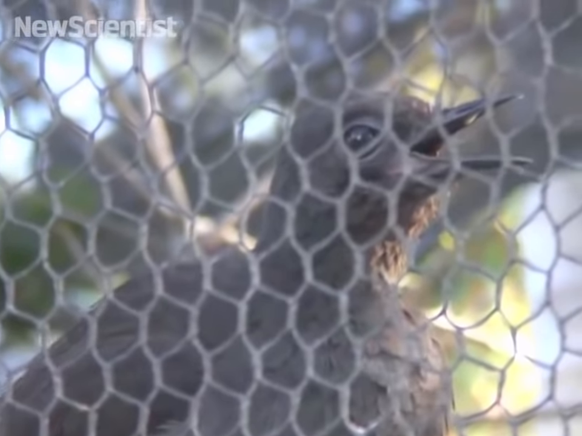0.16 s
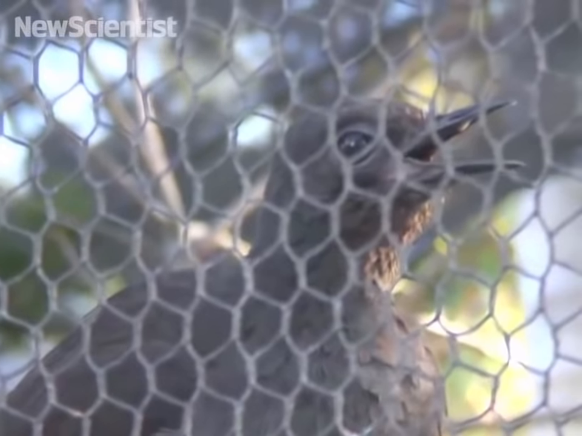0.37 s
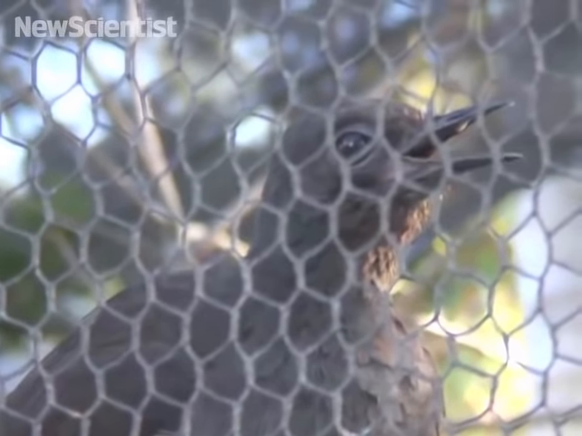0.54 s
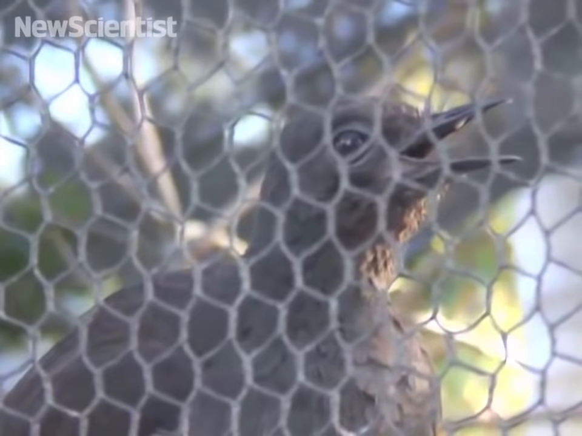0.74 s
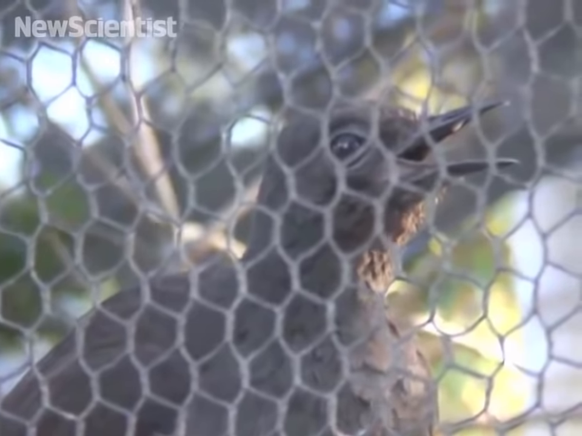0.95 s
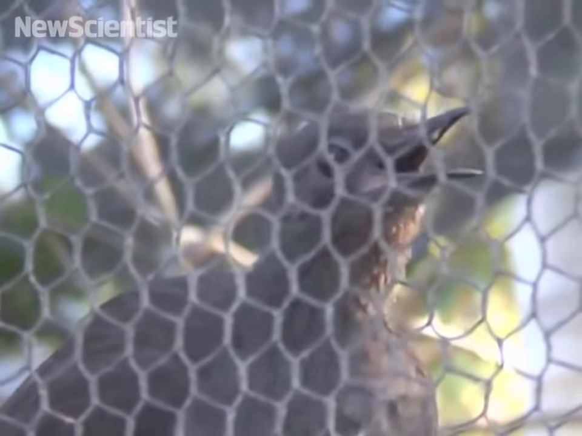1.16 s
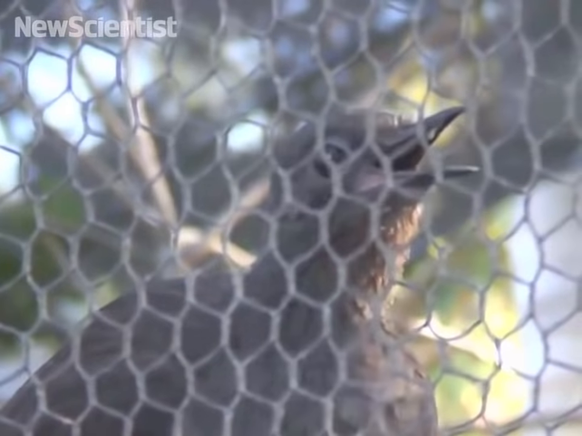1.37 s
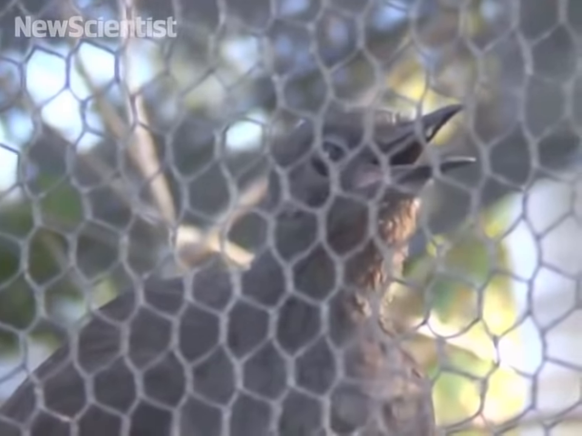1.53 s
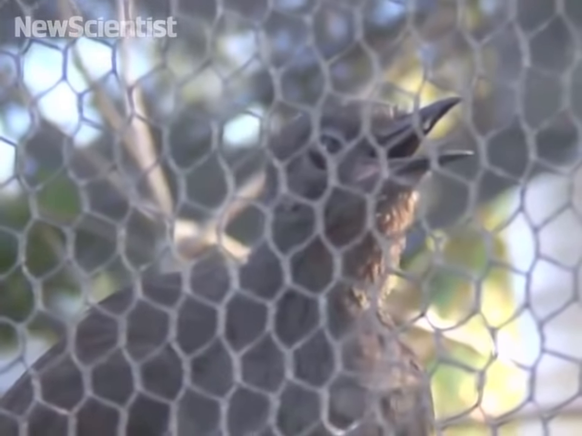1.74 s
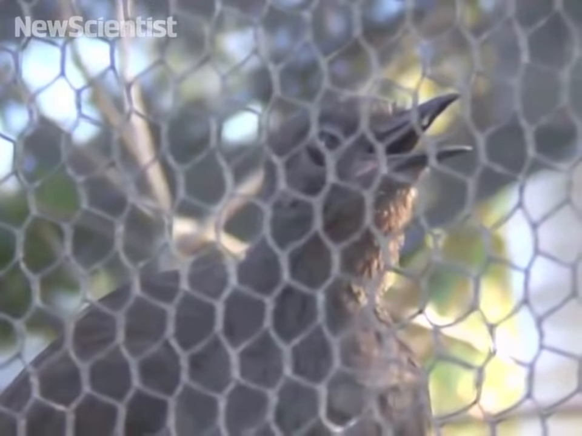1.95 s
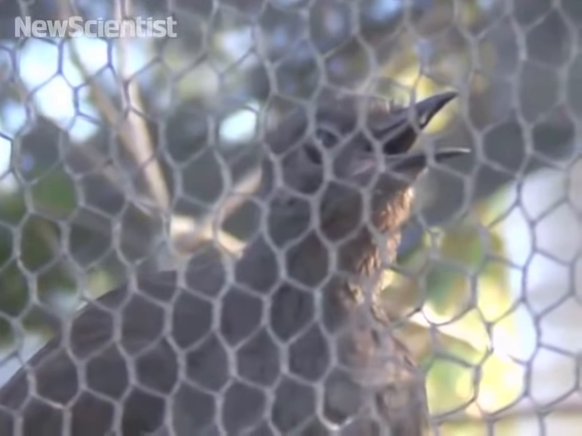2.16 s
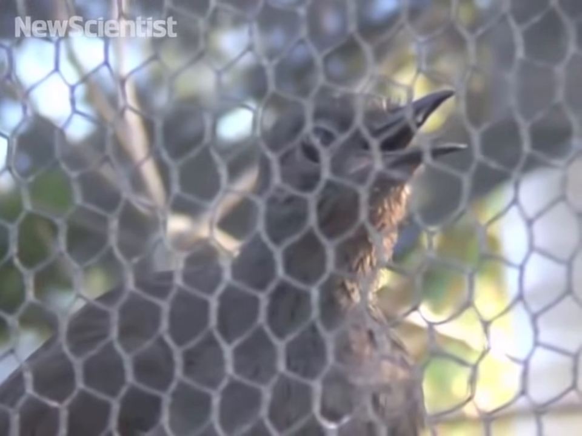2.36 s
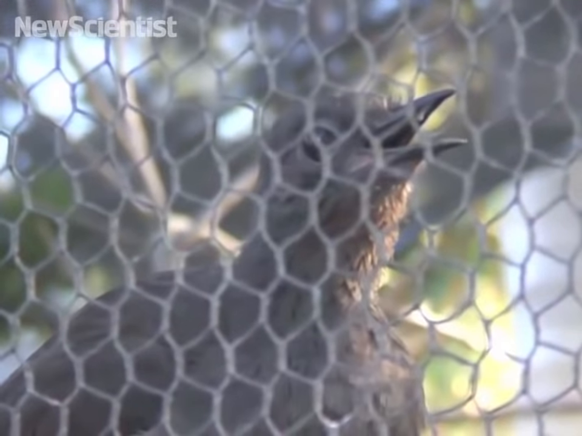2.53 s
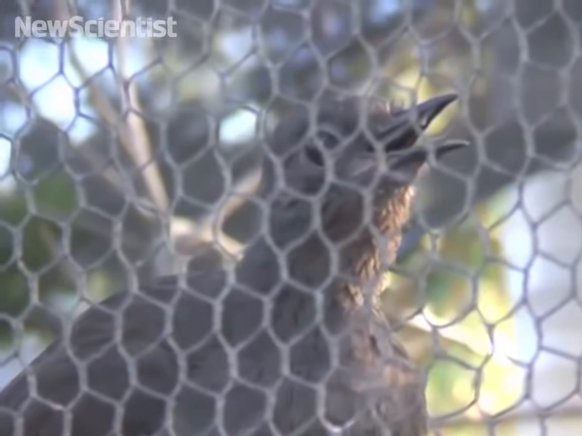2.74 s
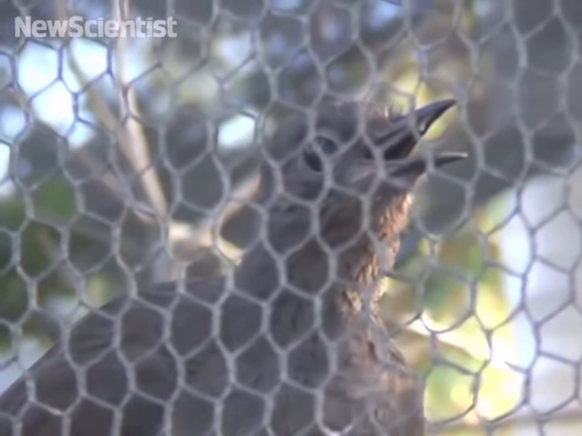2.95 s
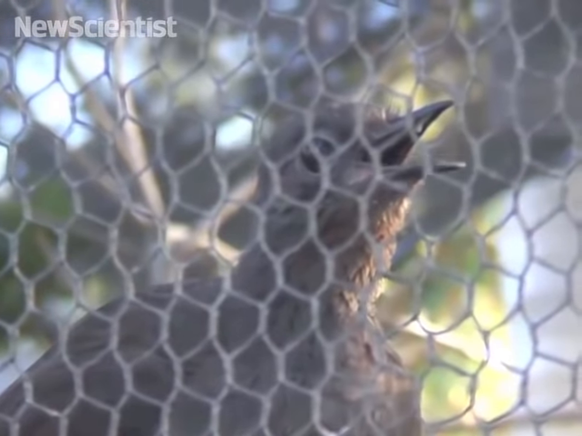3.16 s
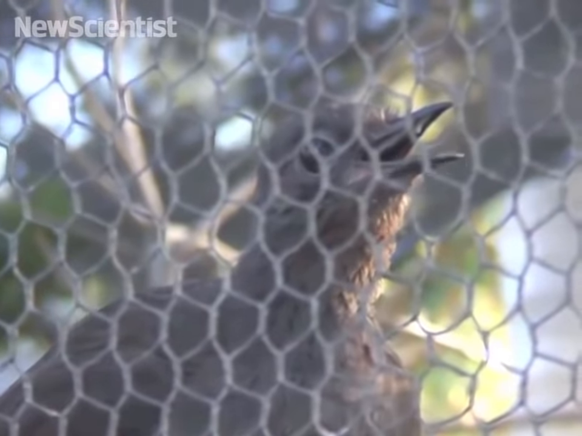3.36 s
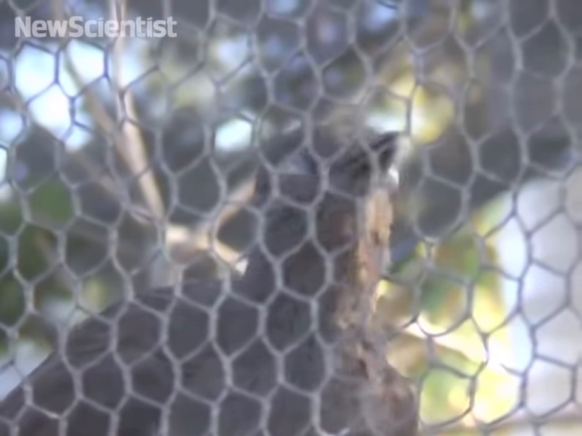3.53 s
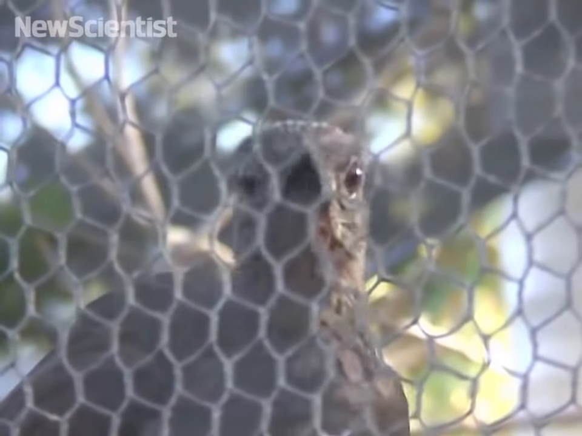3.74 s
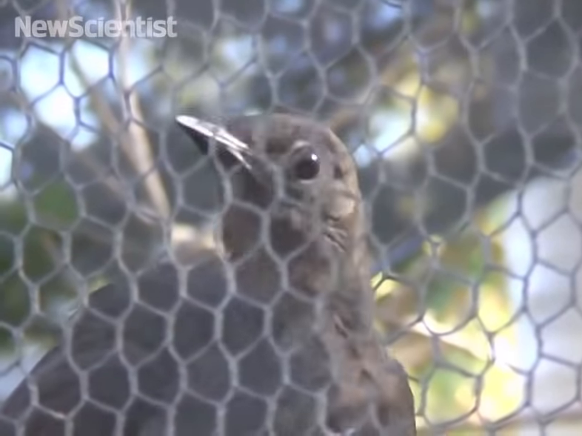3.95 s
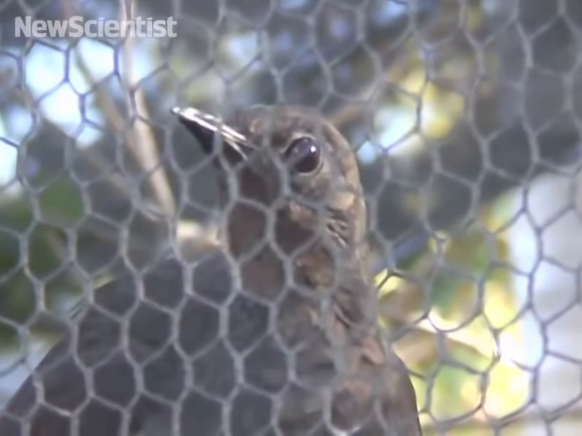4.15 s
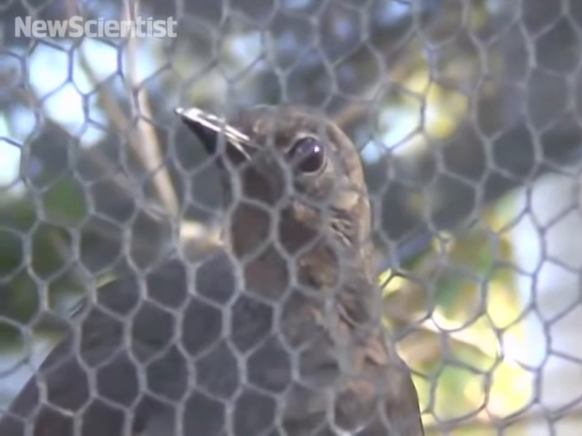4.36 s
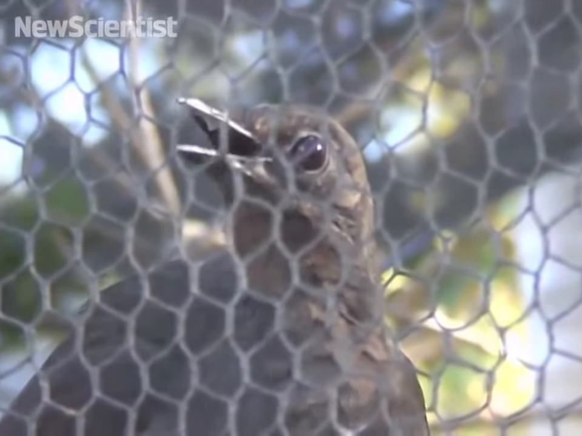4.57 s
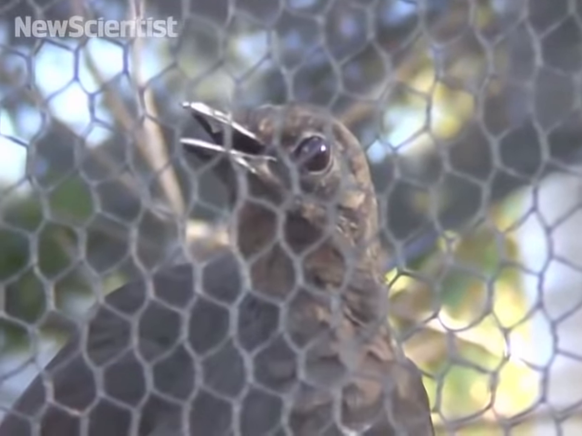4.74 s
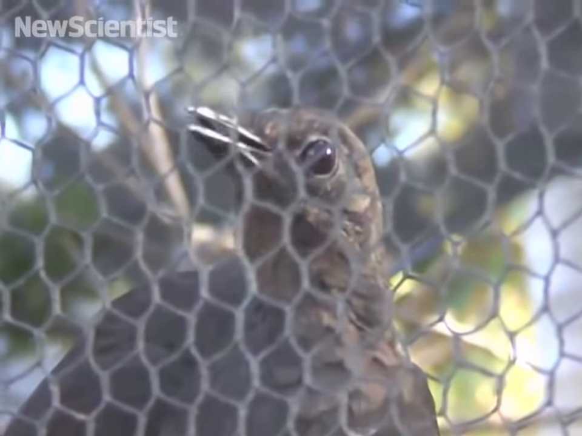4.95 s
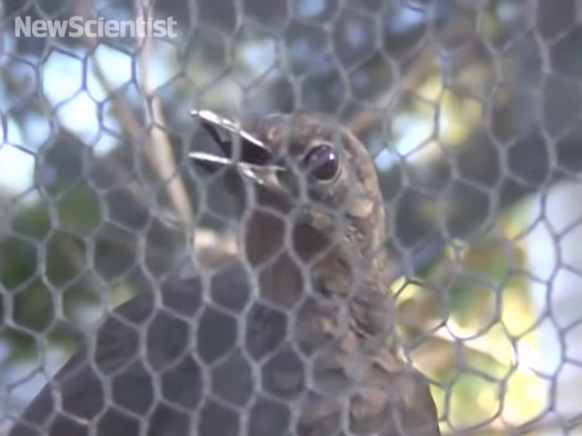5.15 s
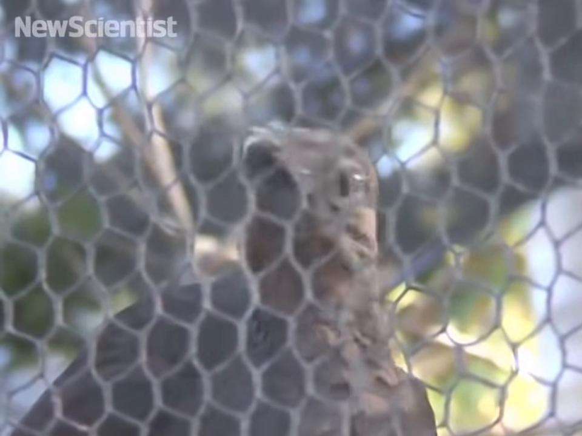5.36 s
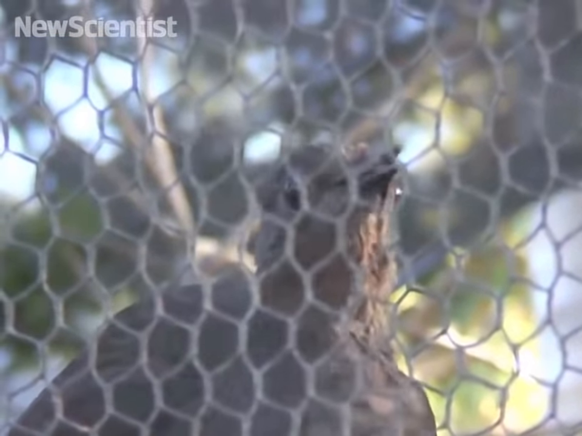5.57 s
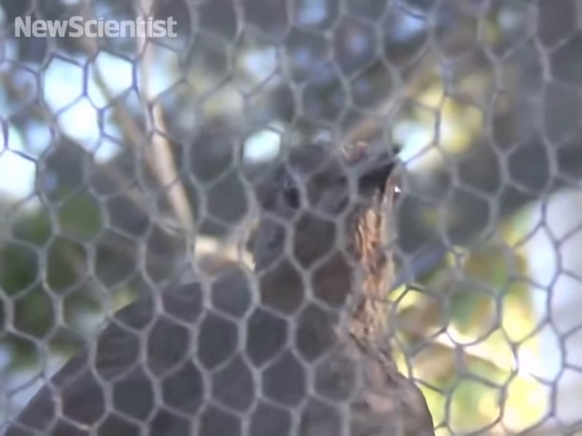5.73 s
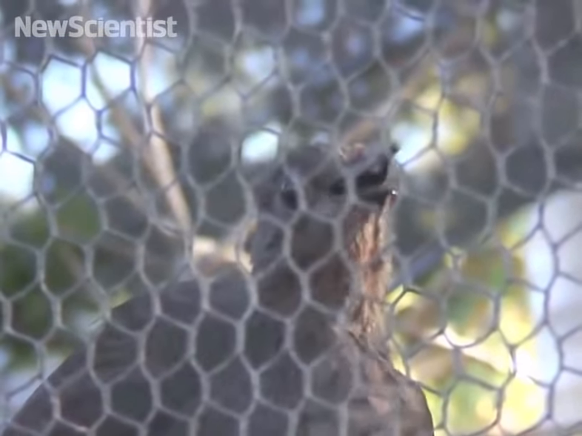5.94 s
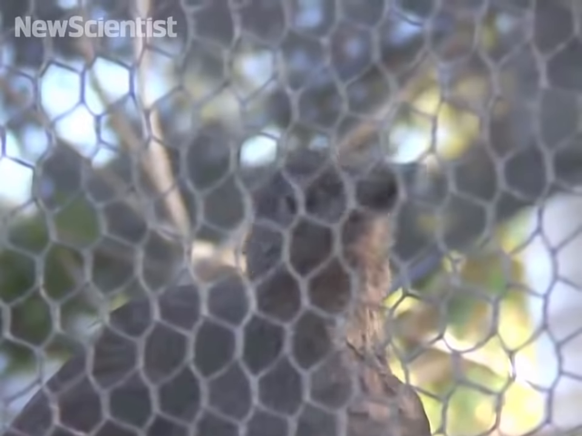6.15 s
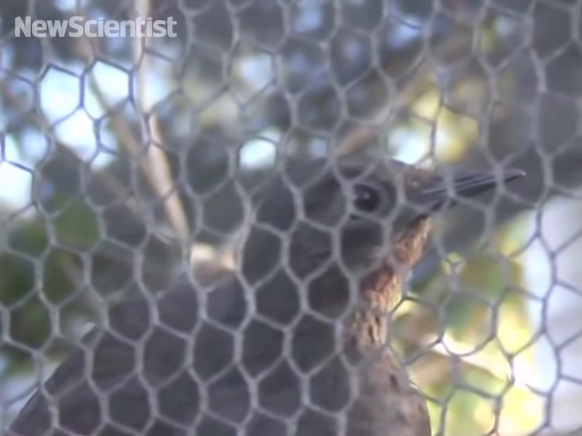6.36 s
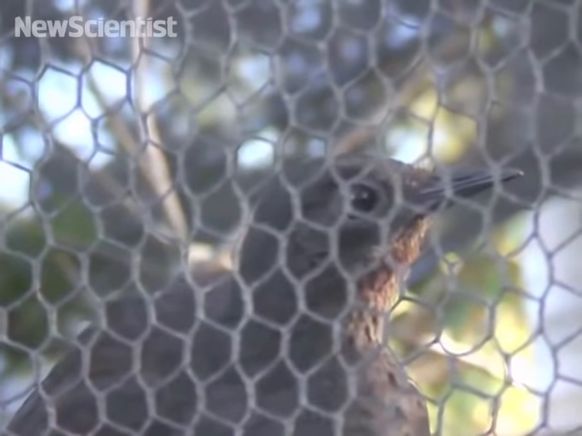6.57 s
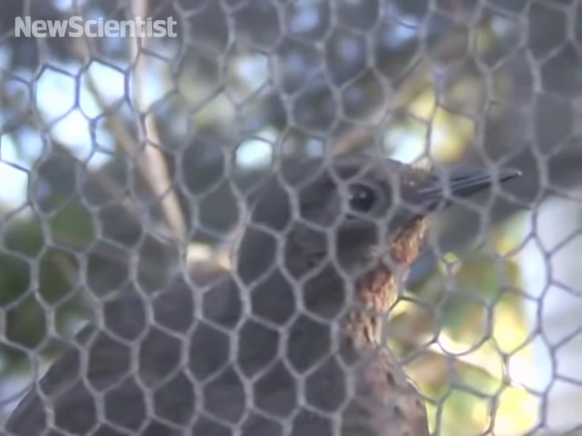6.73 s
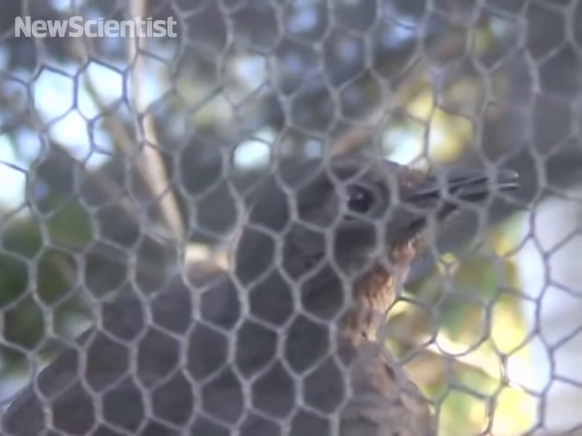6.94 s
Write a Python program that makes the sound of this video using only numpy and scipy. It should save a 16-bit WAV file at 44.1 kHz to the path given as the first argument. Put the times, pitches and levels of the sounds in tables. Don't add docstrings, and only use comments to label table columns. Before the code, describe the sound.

Fast buzzing ratchet chatter from a mimicking bird stops with a sharp crack; distant birds coo, then it grinds, squeals, yelps and knocks once more.

```python
import sys
import numpy as np
from scipy import signal
from scipy.io import wavfile
from scipy.ndimage import uniform_filter1d

SR = 44100
rng = np.random.default_rng(int(sys.argv[2]) if len(sys.argv) > 2 else 0)


def level_to_linear(level):
    exponent = np.asarray(level, float) / 20
    return 10 ** exponent


def wrap_up_sound(samples):
    columns = np.atleast_2d(samples).T
    tamed = np.clip(columns, -1, 1)
    steps = np.round(tamed * 32767).astype(np.int16)
    wavfile.write(sys.argv[1], SR, steps)


N = 308700

# f/Hz, level/dB
AIR_SPECTRUM = [(35, -28), (60, -25.5), (637, -3.5), (801, -5), (940, -10.5), (2580, -9.5), (2890, -9.5),
                (3240, -6.5), (3470, -10), (7580, -22.5), (8500, -24.5), (12500, -27), (14400, -40)]
# multiple of the tick rate, level/dB
TICK_PARTIALS = [(1, -83), (2, -79), (3, -80), (4, -81.5), (5, -91), (6, -86), (7, -101), (8, -101),
                 (9, -76.5), (10, -107)]
# t/s, f/Hz, level/dB
INSECT_LINE = [(0, 12400, -84), (3.6, 12450, -88), (4.0, 12400, -77), (4.5, 12050, -76), (5.0, 12050, -79),
               (5.5, 12250, -85), (6.2, 12350, -84), (7, 12300, -84)]
# t/s, length/s, start f/Hz, end f/Hz, level/dB
FAR_COOS = [
    (3.62, 0.079, 765, 690, -56),
    (3.795, .12, 660, 850, -55),
    (3.9, 0.22, 846, 797, -67),
    (4.08, 0.28, 814, 756, -59.5),
    (4.33, .27, 782, 646, -56),
    (6.11, .35, 880, 794, -67),
    (6.44, 0.23, 805, 780, -66),
    (6.62, .33, 872, 870, -64),
]
# t/s, length/s, start f/Hz, end f/Hz, level/dB
FAR_PIPES = [
    (3.82, 0.3, 910, 900, -64),
    (4.36, .18, 903, 915, -61),
]
# t/s, length/s, start f/Hz, end f/Hz, level/dB
FAR_PEEPS = [(4.26, 0.13, 3250, 2500, -48.5), (4.325, 0.076, 2600, 2150, -55), (4.33, .1, 3300, 2600, -54),
             (4.48, .12, 4200, 4300, -62), (5.59, .08, 3750, 3650, -50), (5.865, .03, 1900, 1950, -59),
             (5.8, .05, 3750, 3540, -58), (5.855, .085, 3740, 3700, -51), (5.89, .06, 2620, 2690, -56),
             (6.37, .03, 7200, 5800, -48), (6.396, 0.03, 6200, 7600, -52), (6.42, .035, 6300, 6500, -48),
             (6.41, .06, 7400, 7500, -56), (6.19, 0.17, 5650, 5450, -63), (6.715, .04, 6600, 6700, -57),
             (6.72, .04, 7000, 7800, -60), (5.02, 0.067, 6600, 6700, -61), (6.615, .09, 2680, 2780, -56),
             (6.13, .08, 3600, 3720, -56), (6.16, .1, 2600, 2650, -62), (6.84, .05, 2800, 2850, -60)]
# t/s, length/s, start f/Hz, end f/Hz, level/dB
NASAL_CALLS = [
    (3.979, .14, 1470, 1603, -62.5),
    (6.06, 0.14, 1450, 1538, -55.5),
]
# multiple, level/dB
NASAL_STACK = [(1, -7), (2, 5), (3, 7.5), (4, 3), (5, -10), (6, -15), (7, -16)]
# t/s, length/s, level/dB
FAR_SCREECHES = [
    (6.404, 0.27, -41.5),
    (6.711, 0.25, -42.5),
]
# factor on the sweep, width/Hz, level/dB
SCREECH_STACK = [(1.017, 1000, 4), (0.86, 180, -1), (0.716, 270, -7.5), (2, 1200, -16), (1.47, 820, -12.5)]
# t/s, f/Hz, level/dB
SCREECH_ONSET = [(0, 3200, -6), (.02, 3800, -1), (.03, 4500, -2), (.06, 4450, -7), (.12, 4500, -16)]

# f/Hz, level/dB per Hz
RASP_COLOUR = [(350, -27.5), (630, -13.5), (730, -3), (1350, -5), (2200, -0.5), (3390, -5.5), (4020, -2),
               (4560, -7), (5840, -8.5), (7040, -22.5), (7610, -17.5), (8490, -23.5), (11100, -21.5),
               (13500, -33.5), (14400, -70)]
# f/Hz, level/dB per Hz
SNAP_COLOUR = [(290, -49), (500, -16), (2310, -0.5), (3430, -3), (5770, -4.5), (7030, -19), (11200, -20.5),
               (13200, -31), (14400, -52)]
# t/s, level/dB
WHIRR_EFFORT = [(0.0, -26), (0.27, -30.5), (1.18, -30.5), (1.36, -29.5), (2.03, -30), (2.34, -26.5),
                (2.82, -28.5), (3.4, -28.5), (3.505, -29), (3.518, -36)]
# t/s, treble level/dB, ring f/Hz
BEAK_OPENING = [(0, -4.5, 2480), (.3, -4, 2180), (1.05, -1, 2160), (1.2, -1, 2680), (2.1, 2, 2600),
                (2.5, 2, 2720), (3.0, 1.5, 2260), (3.518, -0.5, 2140)]
# first snap t/s, rough gap/ms, peak level/dB
SNAP_RUNS = [(0.0334, 25, -13), (0.0844, 22, -16.5), (0.1508, 25, -17), (0.3029, 27, -22),
             (0.4641, 27, -19.5), (0.5456, 31, -19), (0.6393, 27, -20), (0.8002, 28, -16),
             (0.9106, 34, -16), (1.0119, 27, -19), (1.0674, 26, -16)]
# t/s, peak level/dB, ring f/Hz
LOUD_SNAPS = [(1.0674, -18, 1880), (1.0933, -17, 2240), (1.1202, -18, 2000), (1.1467, -13, 2680),
              (1.1716, -18, 2280), (1.1986, -12, 2370), (1.2245, -13, 2220), (1.2509, -14, 2040),
              (1.2779, -13, 2120), (1.3073, -12, 2320), (1.3348, -14, 2750), (1.3622, -12, 2320),
              (1.3881, -14, 2230), (1.4161, -14, 2790), (1.4425, -16, 2370), (1.4709, -16, 2800),
              (1.4964, -14, 2820), (1.5228, -17, 2020), (1.5498, -12, 2820), (1.5762, -13, 1460),
              (1.6031, -17, 2100), (1.6306, -17, 2940), (1.657, -16, 2800), (1.6815, -14, 2920),
              (1.7104, -11, 2750), (1.7368, -13, 2810), (1.7588, -13, 2330), (1.7867, -11, 2940),
              (1.8122, -14, 2810), (1.8431, -14, 2690), (1.877, -14, 1470), (1.9094, -15, 1910),
              (1.9404, -20, 1520), (1.9683, -14, 2810), (1.9962, -17, 2480), (2.0272, -14, 2740),
              (2.0566, -19, 2600), (2.084, -15, 2000), (2.1095, -14, 2940), (2.1359, -15, 2820),
              (2.1609, -13, 2830), (2.1858, -11, 2920), (2.2093, -11, 2690), (2.2337, -14, 2690),
              (2.2577, -14, 2830), (2.2816, -15, 2820), (2.3035, -10, 2690), (2.3285, -12, 2260),
              (2.3544, -15, 2690)]
# t/s, peak level/dB, ring f/Hz
LATER_SNAPS = [(2.3783, -14, 2050), (2.4013, -14, 2930), (2.4237, -16, 2300), (2.4452, -16, 2680),
               (2.4701, -14, 2820), (2.4946, -13, 2130), (2.5195, -14, 2530), (2.5465, -16, 2040),
               (2.5719, -17, 2760), (2.5973, -15, 2190), (2.6243, -14, 2170), (2.6517, -16, 2610),
               (2.6737, -17, 2200), (2.6956, -15, 2370), (2.7186, -15, 2780), (2.744, -17, 2300),
               (2.767, -16, 2080), (2.7894, -19, 2310), (2.8119, -17, 2370), (2.8358, -18, 2040),
               (2.8568, -17, 2010), (2.8862, -18, 2090), (2.9061, -19, 2200), (2.9316, -19, 2930),
               (2.9525, -18, 1940), (2.9785, -16, 2320), (3.0034, -20, 2700), (3.0289, -19, 1930),
               (3.0538, -20, 1450), (3.0817, -15, 2540), (3.1087, -14, 2100), (3.1361, -18, 1880),
               (3.1646, -17, 1890), (3.194, -14, 2380), (3.2224, -13, 2330), (3.2479, -17, 2090),
               (3.2753, -16, 2050), (3.3012, -14, 2040), (3.3342, -18, 2080), (3.3591, -16, 2100),
               (3.3895, -16, 2200), (3.4165, -19, 2140), (3.4419, -16, 2730), (3.4773, -17, 2830),
               (3.5048, -18, 1920)]
# start t/s, end t/s, slap rate f/Hz, level/dB
WIND_UP_SLAPS = (3.514, 3.538, 642.5, -33.5)
# t/s, crack level/dB, crack length/s, slap rate f/Hz, tail t60/s, tail level/dB, tail length/s
KNOCK_BLOWS = [
    (3.5365, -6.5, 0.0068, 1167, 0.088, -15, 0.023),
    (6.9445, -1.3, 0.0073, 760, 0.19, -22, .15),
]
# f/Hz, level/dB per Hz
CRACK_COLOURS = [
    [(240, -37), (400, -20), (2490, -1), (3310, -8), (3950, 3), (4660, -11), (8440, -21), (9370, -19.5),
     (14000, -37)],
    [(240, -51), (400, -25.5), (1400, 0), (2890, -4), (4390, -15.5), (5170, -38), (5730, -26), (9230, -24),
     (14000, -45)],
]
# f/Hz, level/dB per Hz
TAIL_COLOURS = [
    [(210, -40), (400, -7), (818, -4), (1130, -8), (5290, -13), (5810, -10), (6990, -30), (11100, -33),
     (14000, -43)],
    [(180, -60), (300, -28), (427, -3.5), (726, 0), (4540, -21), (6170, -31), (6790, -30), (9220, -25),
     (14000, -42)],
]
# t/s, peak level/dB, length/s
SQUEAL_CATCHES = [
    (4.608, -20, 0.0053),
    (4.618, -31, 0.0086),
    (4.623, -32, 0.0048),
    (4.632, -21.5, 0.0072),
    (4.645, -22, 0.0081),
    (4.655, -29, 0.0076),
    (4.674, -21.5, 0.0041),
]
# f/Hz, level/dB
OVERTONE_LEVELS = [(300, -3.5), (1400, -3.5), (2600, -3.5), (4000, -5), (5300, -8), (7000, -23),
                   (10000, -25), (14000, -42)]
# t/s, pitch f/Hz, tone level/dB, rasp level/dB
GRIND_CURVE = [(4.655, 641.2, -43.5, -53), (4.69, 717, -38, -48), (4.746, 715, -33, -49)]
# t/s, pitch f/Hz, tone level/dB, rasp level/dB
LONG_SQUEAL_CURVE = [(4.757, 950, -35, -44), (4.785, 1138, -32, -44.5), (4.829, 1275, -35, -45.5),
                     (4.881, 1345, -34, -49.5), (4.93, 1292, -37, -48), (4.965, 1199, -39, -48.5),
                     (4.995, 850, -38.5, -64), (5.04, 472, -43.5, -67), (5.11, 410, -48, -88)]
# t/s, pitch f/Hz, tone level/dB, rasp level/dB
HIGH_SQUEAL_CURVE = [(5.135, 531.6, -40, -60), (5.203, 620, -38.5, -49), (5.222, 920, -33, -56),
                     (5.27, 1440, -30.5, -49), (5.312, 1790, -30, -53), (5.337, 1520, -30, -49),
                     (5.37, 755, -40.5, -56), (5.39, 468, -44.5, -70), (5.43, 400, -64, -85)]
# t/s, pitch f/Hz, tone level/dB, rasp level/dB
FIRST_RASP_CURVE = [(5.465, 521.4, -64, -78), (5.482, 560, -39.5, -59), (5.52, 686, -37, -49.5),
                    (5.56, 800, -34, -53), (5.59, 600, -42, -54), (5.62, 450, -50, -64),
                    (5.66, 440, -58, -71)]
# t/s, pitch f/Hz, tone level/dB, rasp level/dB
YELP_CURVE = [(5.69, 516.4, -48, -72), (5.705, 700, -34.5, -51), (5.733, 850, -29.5, -44),
              (5.76, 707, -31, -40.5), (5.78, 570, -37.5, -46), (5.805, 430, -44, -67),
              (5.83, 370, -66, -90)]
# t/s, pitch f/Hz, tone level/dB, rasp level/dB
LAST_RASP_CURVE = [(5.94, 600, -68, -82), (5.957, 688.4, -38, -64), (5.981, 736, -35, -51),
                   (6.02, 740, -35.5, -46.5), (6.045, 658.6, -41.5, -51.5), (6.065, 521, -48, -65),
                   (6.089, 430, -50.5, -66), (6.11, 405, -71, -79)]
# start t/s, hoarseness 0-1, share of the second voice 0-1, brightness/dB per octave
VOICE_STATES = [
    (4.6, .6, .2, -2),
    (4.765, .13, .45, -1.4),
    (4.98, .12, .03, -2.5),
    (5.125, .95, .3, 0),
    (5.207, .2, .05, -.3),
    (5.45, .95, .35, 0),
    (5.6, .9, .1, -1),
    (5.69, .45, .15, 0),
    (5.79, .3, 0, -1),
    (5.9, .9, .75, -1),
]
# t/s, dip/dB
SQUEAL_BREAKS = [
    (5.207, -6),
    (5.222, -4),
    (5.25, -9),
    (5.27, -6),
    (5.292, -9),
    (5.309, -7),
    (5.336, -4),
    (5.353, -8),
    (5.372, -3),
]
# f/Hz, width/Hz, level/dB
HOUSING_RIPPLE = [(962, 174, 4), (3460, 280, -2.5), (4100, 180, 3.5), (5350, 130, -4.5), (6060, 510, 4.5),
                  (6900, 220, -4), (7820, 230, 6), (8240, 530, -6), (9330, 210, 6), (10180, 340, -5),
                  (10780, 260, 3), (12300, 270, -1)]


def evened(x):
    return x / np.sqrt(np.mean(x ** 2) + 1e-20)


def read(points, hz):
    f, value = np.transpose(points)
    return np.interp(np.log(hz + 1), np.log(f + 1), value)


def add(mix, s, sound):
    part = mix[round(s * SR):][:len(sound)]
    part += sound[:len(part)]


def spread(rows):
    s, *columns = np.transpose(rows)
    t = np.arange(s[0], s[-1], 1 / SR)
    return s[0], [np.interp(t, s, c) for c in columns]


def drift(size, span):
    once = uniform_filter1d(rng.standard_normal(size), int(span))
    return evened(uniform_filter1d(once, int(span)))


def coloured(x, gain_db):
    both_sides_db = np.r_[gain_db, gain_db[-2:0:-1]]
    log_gain = np.log(level_to_linear(np.maximum(both_sides_db, -100)))
    taps = np.fft.ifft(np.exp(np.conj(signal.hilbert(log_gain)))).real[:2048]
    return signal.oaconvolve(x, taps)[:len(x)]


def shaped(x, points):
    return evened(coloured(x, read(points, np.fft.rfftfreq(4096, 1 / SR))))


def highpass(x, order, hz):
    return signal.sosfilt(signal.butter(order, hz, "high", fs=SR, output="sos"), x)


def resonate(x, hz, width):
    turn = np.exp(2j * np.pi * np.cumsum(hz * np.ones(len(x))) / SR)
    r = np.exp(-np.pi * width / SR)
    return 2 * (turn * signal.lfilter([(1 - r) ** 2], [1, -2 * r, r * r], x / turn)).real


def diffuse_tail(size, t60):
    tail = rng.standard_normal(size) * level_to_linear(-60 * np.arange(size) / SR / t60)
    return tail / np.linalg.norm(tail)


def aviary_air():
    level_db = -54.5 + 1.0 * drift(N, span=2100)
    return level_to_linear(level_db) * shaped(rng.standard_normal(N), AIR_SPECTRUM)


def camera_hum():
    tick_hz, first_tick_s = 50 / 3, .0061
    turns = (np.arange(N) / SR - first_tick_s) * tick_hz
    return sum(np.sqrt(2) * level_to_linear(db) * np.cos(2 * np.pi * round(k) * turns) for k, db in TICK_PARTIALS)


def insect():
    hz, level_db = spread(INSECT_LINE)[1]
    return level_to_linear(level_db - 1) * evened(resonate(rng.standard_normal(len(hz)), hz, width=13))


def far_call(start, length, hz, end_hz, db, partials, width, bend=1):
    u = np.arange(0, length, 1 / SR) / length
    glide = end_hz + (hz - end_hz) * (1 - u) ** bend
    noise = rng.standard_normal(len(u))
    call = sum(level_to_linear(part_db) * evened(resonate(noise, k * glide, width * k)) for k, part_db in partials)
    return start, level_to_linear(db - 2) * call * np.sin(np.pi * u) ** 0.52


def screech(start, length, db):
    base_hz, top_hz, sag_hz_per_s, sweep_s = 3700, 6630, 4700, 0.087
    rise_s, fade_db = .03, -14.5
    t = np.arange(0, length, 1 / SR)
    hz = top_hz - (top_hz - base_hz) * np.exp(-t / sweep_s) - sag_hz_per_s * t
    noise = rng.standard_normal(len(hz)) * level_to_linear(2.0 * drift(len(hz), span=72))
    bands = sum(level_to_linear(band_db) * evened(resonate(noise, k * hz, w)) for k, w, band_db in SCREECH_STACK)
    bands = evened(bands) * np.minimum(.25 + t / .07, 1)
    edge_hz, edge_db = spread(SCREECH_ONSET)[1]
    add(bands, 0, level_to_linear(edge_db) * evened(resonate(noise[:len(edge_hz)], edge_hz, width=220)))
    rise = np.minimum(0.45 + .6 * t / rise_s, 1)
    return start, rise * level_to_linear(db + fade_db * (t / length) ** 2) * bands


def far_birds():
    out, further = np.zeros(N), np.zeros(N)
    add(out, 0, insect())
    for calls, width_hz in ((FAR_COOS, 30), (FAR_PIPES, 13), (FAR_PEEPS, 110)):
        for row in calls:
            add(out, *far_call(*row, [(1, 0)], width_hz))
    for row in NASAL_CALLS:
        add(out, *far_call(*row, NASAL_STACK, width=45, bend=2.5))
    for row in FAR_SCREECHES:
        add(further, *screech(*row))
    wet = level_to_linear(-4) * out + level_to_linear(2.5) * further
    return out + further + signal.oaconvolve(wet, diffuse_tail(SR // 2, t60=.5))[:N]


def rasp(size, hz, jitter, breath, flutter_db, colour=RASP_COLOUR, uneven_db=3.0):
    turns = np.cumsum(hz * level_to_linear(jitter * drift(size, span=30))) / SR
    slaps = np.diff(np.floor(turns), prepend=0) > 0
    slaps = slaps * level_to_linear(uneven_db * np.clip(rng.standard_normal(size), -2, 2))
    flutter = np.cos(2 * np.pi * np.cumsum(185 * (1 + 0.1503 * drift(size, span=291))) / SR)
    source = evened(slaps) + breath * rng.standard_normal(size)
    return shaped(source * level_to_linear(flutter_db * flutter), colour)


def catch(db, length):
    t = np.arange(round(3 * length * SR)) / SR
    slaps = rasp(len(t), 700, jitter=1.2, breath=0.52, flutter_db=-5)
    slaps += 0.75 * np.sin(2 * np.pi * 720 * t)
    return level_to_linear(db - 10) * slaps * np.minimum(t / 0.00065, 1) / (1 + (t / length) ** 6)


def stutter(t, hz):
    break_s, step_share = .002, .4
    when, dip_db = np.transpose(SQUEAL_BREAKS)
    middle = (when[1:] + when[:-1]) / 2
    step = np.clip(np.searchsorted(when, t) - 1, 0, len(middle) - 1)
    inside = (t > when[0]) * (t < when[-1])
    cling = step_share * (np.interp(middle, t, hz)[step] - hz) * inside
    gaps_db = sum(db * np.exp(-((t - s) / break_s) ** 2) for s, db in zip(when, dip_db))
    return hz + uniform_filter1d(cling, size=120), level_to_linear(gaps_db)


def song():
    syllables = GRIND_CURVE + LONG_SQUEAL_CURVE + HIGH_SQUEAL_CURVE
    syllables = syllables + FIRST_RASP_CURVE + YELP_CURVE + LAST_RASP_CURVE
    s, (hz, tone_db, rasp_db) = spread(syllables)
    size = len(hz)
    t = s + np.arange(size) / SR
    hz, gaps = stutter(t, uniform_filter1d(hz, 350) * (1 + .009 * drift(size, span=350)))

    when, *columns = np.transpose(VOICE_STATES)
    state = np.searchsorted(when, t) - 1
    change_s = 0.0282
    hoarse, second, bright_db = (uniform_filter1d(c[state], round(change_s * SR)) for c in columns)

    turns = np.cumsum(hz * (1 + .09 * hoarse * drift(size, span=120))) / SR
    soft_db = bright_db + 0.21 * np.minimum(tone_db + 44, 0) + 2.6 * np.log2(hz / 2000)
    tone = np.zeros(size)
    for k in range(1, 16):
        level_db = read(OVERTONE_LEVELS, k * hz) - read(OVERTONE_LEVELS, hz)
        level_db += (soft_db + 1.27 * drift(size, span=280)) * np.log2(k)
        tone += level_to_linear(level_db) * (k * hz < 12000) * np.cos(2 * np.pi * k * turns)

    growl_pulse_db = 5 * np.cos(2 * np.pi * 76 * t)
    growl = resonate(rng.standard_normal(size), 700, width=117) * level_to_linear(growl_pulse_db)
    growl = second * evened(growl)
    half = level_to_linear(-17 + 5 * drift(size, span=150)) * (t < 4.75) * np.cos(np.pi * turns)
    air = rasp(size, hz, jitter=3.5, breath=0.51, flutter_db=2.0)
    air += 0.31 * highpass(air, 2, 6500)
    beat = level_to_linear((1.0 + 1.3 * hoarse) * drift(size, span=210))
    voice = gaps * beat * tone * (1 + 0.3 * growl) + .5 * growl + half
    voice = np.sqrt(2) * level_to_linear(tone_db) * voice + level_to_linear(rasp_db + 7 + 9.8 * hoarse) * air
    return s, highpass(voice, 4, 335)


def knock(db, crack, hz, t60, tail_db, length, crack_colour, tail_colour):
    t = np.arange(SR // 5) / SR
    blow = rasp(len(t), hz, jitter=0.67, breath=0.57, flutter_db=-1.5, colour=crack_colour, uneven_db=-0.5)
    blow *= np.sin(np.pi * np.minimum(t / crack, 1))
    blow *= level_to_linear(db) / abs(blow).max()
    tail = rasp(len(t), 750, jitter=1.3, breath=0.88, flutter_db=0.5, colour=tail_colour)
    tail *= level_to_linear(tail_db - 60 * t / t60) * np.minimum(t / crack, 1)
    return blow + tail / (1 + (t / length) ** 4)


def snaps():
    start, gap_ms, db = np.transpose(SNAP_RUNS)
    number = np.r_[0, np.cumsum(np.round(np.diff(start) / gap_ms[:-1] * 1000))]
    each = np.arange(number[-1])
    chance, luck = rng.random((len(each), 2)).T
    scatter_db = 1.5 * (2 * luck - 1)
    level_db = db[np.searchsorted(number, each, "right") - 1] + scatter_db
    even = list(zip(np.interp(each, number, start), level_db, 2200 + 600 * chance))
    later = [(s, peak_db - 1.5, hz) for s, peak_db, hz in LATER_SNAPS]
    return even + LOUD_SNAPS + later


def whirr():
    _, (effort_db,) = spread(WHIRR_EFFORT)
    _, (beak_db, beak_hz) = spread(BEAK_OPENING)
    out = np.zeros(N)
    voice = rasp(N, 800, jitter=4.0, breath=1.14, flutter_db=1.5, uneven_db=3.5)
    throat = np.interp(np.arange(N) / SR, [0, 1.6, 2.1, 2.45, 2.8, 3.5], [1, .6, .7, 1.3, .7, .6])
    voice += 0.58 * throat * resonate(voice, 727, width=90)
    add(voice, 0, 0.38 * resonate(voice[:len(beak_hz)], beak_hz, width=930))
    bursts = rasp(N, 3500, jitter=3.0, breath=3.2, flutter_db=-0.1, colour=SNAP_COLOUR)
    t = np.arange(300) / SR
    swell = np.exp(-((t - .004) / np.where(t < .004, .0019, .0008)) ** 2)
    crack = np.exp(-((t - .004) / np.where(t < .004, .001, .0024)) ** 2)
    for s, db, ring_hz in snaps():
        ring = np.sin(2 * np.pi * ring_hz * t * (.88 + 22 * t))
        add(out, s - .0022, 0.43 * level_to_linear(db) * swell * ring)
        add(out, s - .0019, level_to_linear(db - 15.5) * evened(crack * bursts[round(s * SR):][:len(t)]))
    add(out, .0046, 0.3 * out.copy())
    add(out, 0, level_to_linear(effort_db - 3.4) * voice[:len(effort_db)])
    treble = highpass(out, 2, 6500)[:len(beak_db)]
    add(out, 0, (level_to_linear(beak_db) - 1) * treble)
    start, end, hz, db = WIND_UP_SLAPS
    slaps = rasp(round((end - start) * SR), hz, jitter=.3, breath=.15, flutter_db=-7.0, uneven_db=-3.0)
    add(out, start, level_to_linear(db) * slaps)
    return out


def near_bird():
    bird = np.zeros(N)
    add(bird, *song())
    for s, *row in SQUEAL_CATCHES:
        add(bird, s, catch(*row))
    for (s, *row), crack, tail in zip(KNOCK_BLOWS, CRACK_COLOURS, TAIL_COLOURS):
        add(bird, s, knock(*row, crack, tail))
    bird += level_to_linear(-10) * signal.oaconvolve(bird, diffuse_tail(SR // 8, t60=0.06))[:N]
    bird += whirr()
    return highpass(bird, 3, 260)


def scene():
    return (near_bird() + far_birds() + aviary_air() + camera_hum())[None]


def top_cut(x):
    return signal.sosfilt(signal.butter(12, 14560, fs=SR, output="sos"), x)


def record(dry):
    hz = np.fft.rfftfreq(4096, 1 / SR)
    ripple_db = sum(db * np.exp(-((hz - f) / w) ** 2) for f, w, db in HOUSING_RIPPLE)
    ripple_db -= 50 * (hz > 14400)
    mix = coloured(dry[0], ripple_db)[None]
    return top_cut(mix)


dry = scene()
out = record(dry)
wrap_up_sound(out)
```